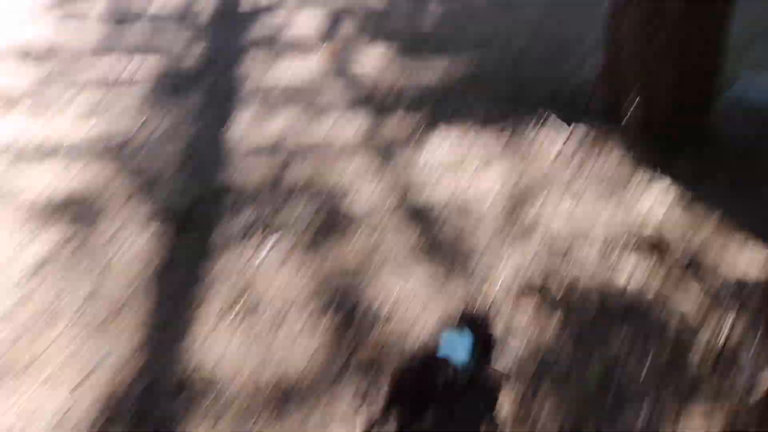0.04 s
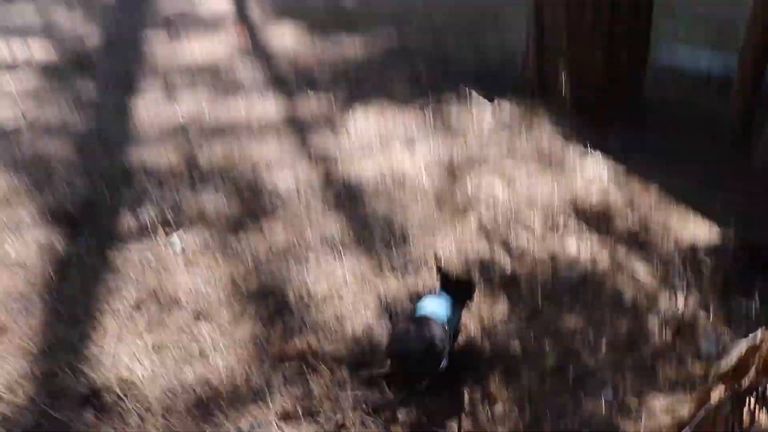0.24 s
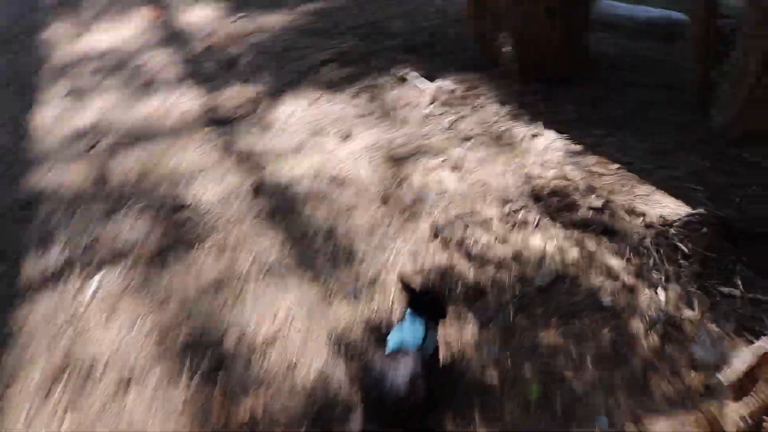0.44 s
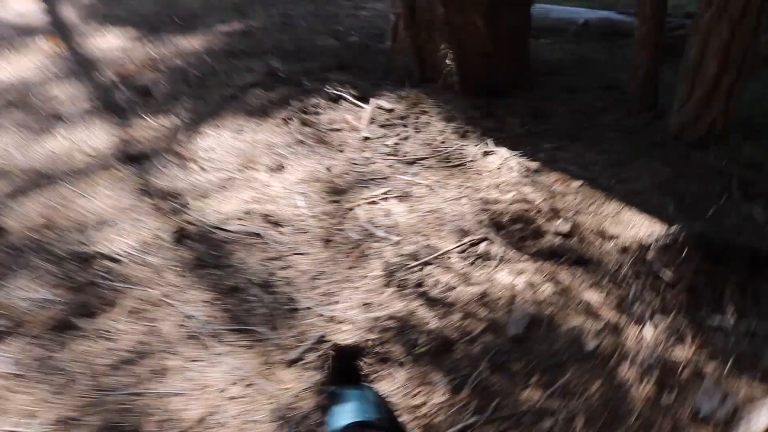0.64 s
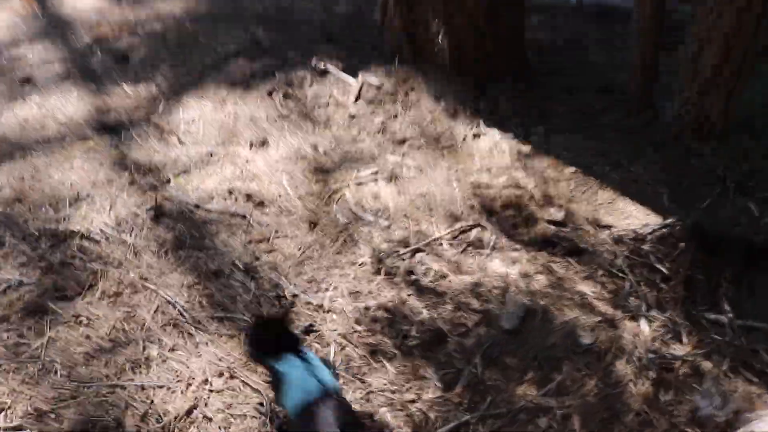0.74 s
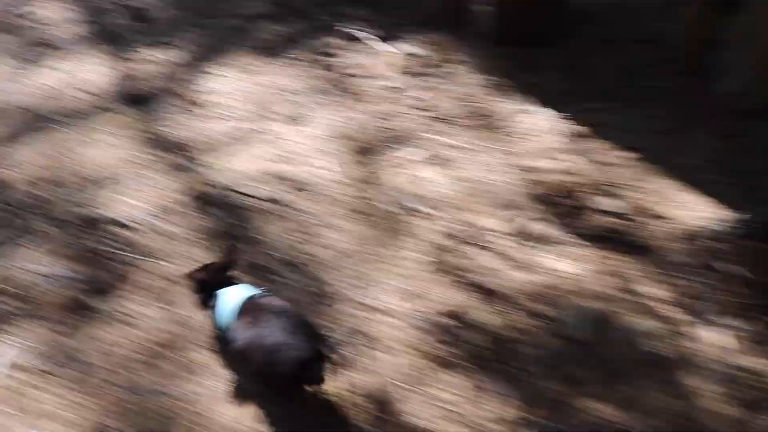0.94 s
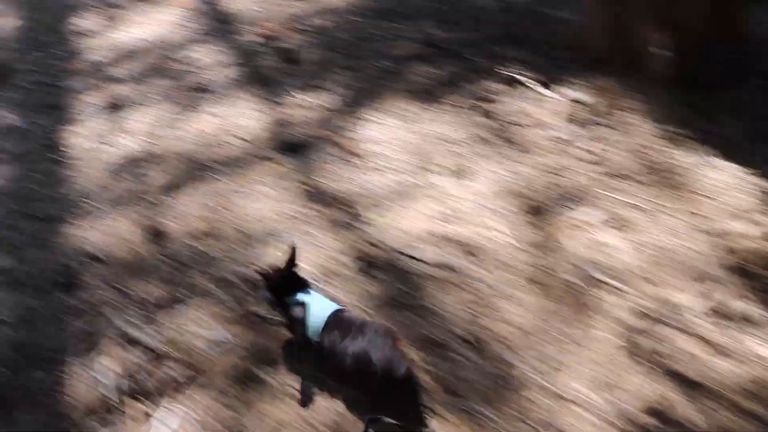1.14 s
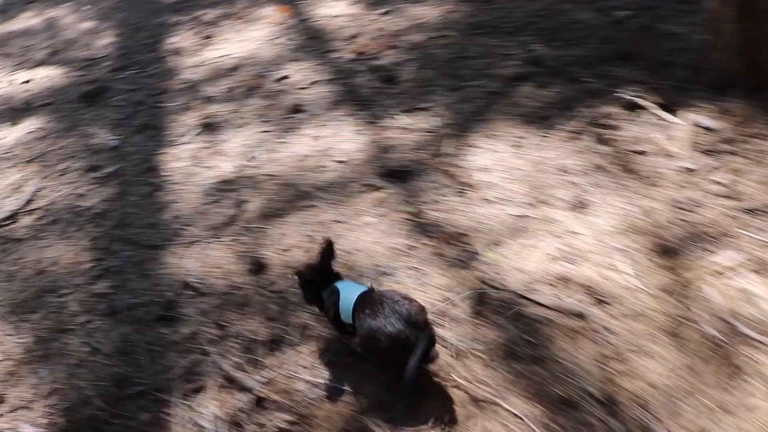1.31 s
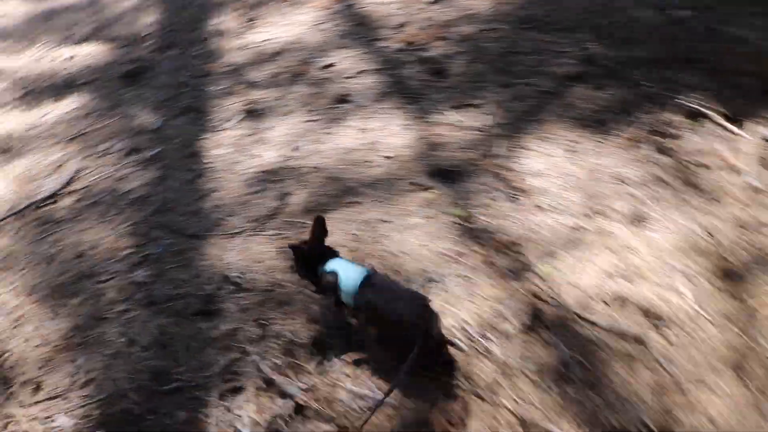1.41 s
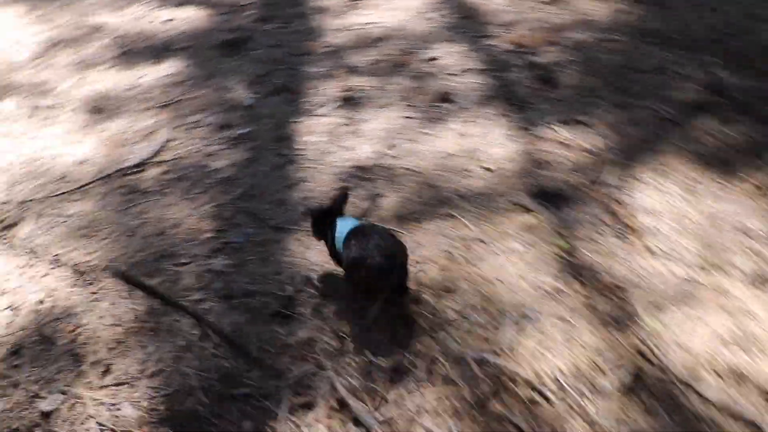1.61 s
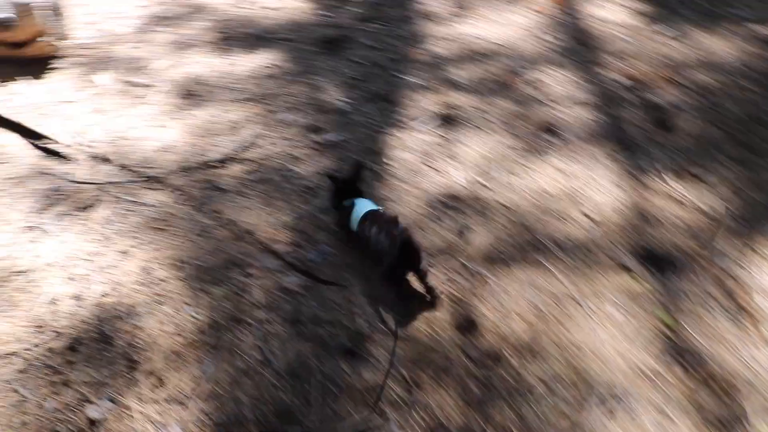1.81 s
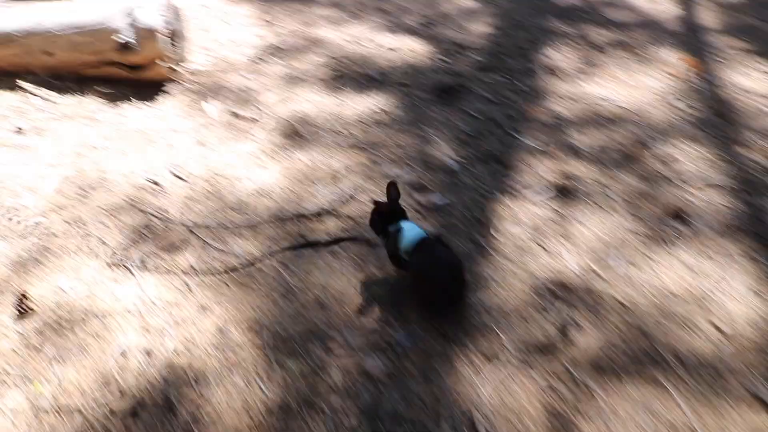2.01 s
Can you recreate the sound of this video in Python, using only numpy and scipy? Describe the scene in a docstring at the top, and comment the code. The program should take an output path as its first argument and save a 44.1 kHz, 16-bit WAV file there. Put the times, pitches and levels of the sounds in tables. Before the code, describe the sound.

Crunching footsteps on dry pine needles and soil, with small twigs snapping underfoot in a forest

```python
"""Footsteps on dry pine litter

A hand-held stereo recorder in a forest, with steps on dry pine needles and soil.
Each step crushes the litter: random clicks ring short resonances as dull pops with a fine bright crackle on top.
Single twigs snap clearly: a noise tick, a damped thud and its dull echo off the ground.
A faint rustle of shaped noise lies below; moving air, lumpy low noise, buffets mainly the right microphone port."""
import sys
import numpy as np
from scipy import signal
from scipy.fft import rfft, irfft
from scipy.io import wavfile
from scipy.ndimage import uniform_filter1d

SR = 44100
rng = np.random.default_rng(int(sys.argv[2]) if len(sys.argv) > 2 else 0)


def int16_out(signal):
    """Quantize to a 16-bit WAV file."""
    q = np.round(np.clip(np.atleast_2d(signal).T, -1, 1) * 32767)
    wavfile.write(sys.argv[1], SR, q.astype(np.int16))


N = 90890   # samples

# Levels below are those at the source, before the stereo lean and the recorder's top cut.
# Faint forest rustle, spectrum: pitch_hz, level_db (relative)
RUSTLE_SPECTRUM = [(24, -6), (40, 6), (163, -10), (269, -1.5), (1680, -13.5), (3470, -12), (5580, -15),
                   (10400, -16.5), (14100, -19), (16000, -25)]
# Rustle common to both sides: pitch_hz, shared_power (0 to 1)
RUSTLE_SHARED = [(100, 0.44), (600, 0.39), (2500, 0.2), (8000, 0.18)]
# Air buffeting the ports, the right port carrying twice this amplitude: start_s, level_db
WIND_BUFFETING = [(0, -70), (.03, -52), (.1, -52), (.13, -43), (.16, -52), (.19, -42), (.23, -56),
                  (.4, -50), (.47, -42), (.52, -38), (.58, -49), (.65, -38), (.7, -61), (.81, -56),
                  (.86, -70), (1.05, -58), (1.08, -49), (1.15, -49), (1.24, -62), (1.29, -50), (1.375, -60),
                  (1.405, -43), (1.46, -52), (1.58, -60), (1.79, -61), (1.815, -54), (1.88, -68),
                  (1.97, -50), (2.01, -48), (2.06, -58)]
# Snapping twigs: start_s, thud_peak_db, middle_tick_peak_db, fine_tick_db (before its trims), middle_tick_pitch_hz
TWIG_SNAPS = [(0.027, -28, -33, -43, 3000), (0.1199, -40, -28, -41, 3700), (0.1255, -34, -27, -35, 1800),
              (0.1684, -33, -32, -36, 2600), (0.244, -46, -32, -29, 4500), (0.3579, -36, -33, -40, 3500),
              (0.4565, -38, -36, -44, 2000), (0.5365, -19, -30, -34, 3000), (0.5771, -27, -25, -28, 4000),
              (0.6202, -28, -25, -31, 4300), (0.656, -24, -29, -22, 1800), (0.669, -30, -34, -44, 1800),
              (0.6804, -36, -39, -38, 3000), (0.7373, -37, -42, -49, 2500), (0.8075, -51, -34, -48, 4200),
              (0.8589, -43, -34, -33, 4500), (0.9801, -26, -34, -38, 3500), (1.0023, -49, -41, -35, 3800),
              (1.0339, -33, -29, -30, 4300), (1.0731, -34, -40, -45, 2000), (1.0825, -50, -36, -50, 4000),
              (1.0897, -33, -36, -38, 2000), (1.1056, -34, -32, -39, 3000), (1.1145, -27, -32, -36, 2500),
              (1.1535, -26, -34, -36, 2000), (1.1693, -18, -21, -28, 1800), (1.1724, -13, -33, -31, 1800),
              (1.18, -18, -32, -36, 4500), (1.2825, -28, -32, -43, 2200), (1.3057, -29, -39, -44, 1800),
              (1.3527, -40, -30, -39, 3200), (1.3698, -36, -36, -44, 2600), (1.4806, -56, -50, -39, 3700),
              (1.4944, -46, -43, -35, 3700), (1.5168, -56, -30, -34, 3700), (1.563, -50, -34, -43, 3100),
              (1.7004, -52, -41, -45, 3500), (1.7408, -42, -40, -47, 2600), (1.7873, -40, -44, -51, 1800),
              (1.8166, -41, -35, -45, 1800), (1.8429, -36, -37, -44, 3500), (1.9282, -25, -28, -36, 3600),
              (1.9633, -30, -30, -44, 1800), (1.9759, -23, -27, -35, 1800), (2.0219, -30, -32, -39, 2100),
              (2.0326, -28, -33, -40, 2200)]
# Litter crushed under the feet: start_s, dull_pops_level_db, middle_crackle_level_db, fine_crackle_level_db
CRUSH_LEVELS = [(0, -48.5, -48, -48), (0.022, -49.5, -42.5, -53), (0.035, -33.5, -42.5, -50),
                (0.06, -40, -40, -43), (0.09, -35.5, -34, -37), (0.13, -43.5, -42, -47.5),
                (0.2, -42, -43.5, -47), (0.25, -46.5, -46.5, -46), (0.31, -58, -55.5, -55),
                (0.35, -61, -58, -58), (0.362, -55, -41.5, -45), (0.39, -53.5, -58.5, -63),
                (0.47, -48.5, -50, -58), (0.5, -38, -41, -42.5), (0.53, -28, -32, -33),
                (0.575, -32.5, -36, -38.5), (0.6, -35, -40, -37.5), (0.625, -36, -38, -42.5),
                (0.645, -45, -46.5, -51), (0.69, -44, -48.5, -48.5), (0.72, -61, -56.5, -62),
                (0.94, -57, -55, -53), (1.06, -51, -49, -49), (1.13, -37.5, -46.5, -48),
                (1.17, -30, -37.5, -37), (1.2, -31, -40.5, -39.5), (1.25, -34, -40.5, -43),
                (1.275, -44, -47, -53), (1.35, -44.5, -46.5, -45.5), (1.385, -57, -57.5, -55.5),
                (1.475, -71, -58, -64), (1.49, -55, -52.5, -48.5), (1.6, -63, -58.5, -57.5),
                (1.79, -59.5, -102, -59), (1.815, -46.5, -49.5, -54), (1.86, -53.5, -55, -53),
                (1.93, -35.5, -42.5, -47), (1.98, -45.5, -46, -48.5), (2.06, -42.5, -46.5, -46.5)]
# Spectrum of the dull pops: pitch_hz, level_db (relative, per Hz)
POP_SPECTRUM = [(200, -9), (290, -5), (400, -12), (520, -8), (720, -3), (1000, -7), (1900, -12.5)]
# Spectrum of the middle crackle: pitch_hz, level_db (relative)
MIDDLE_SPECTRUM = [(1500, -4.5), (2200, -8), (3200, -8), (4600, -5), (5800, -8)]
# Spectrum of the fine crackle: pitch_hz, level_db (relative)
FINE_SPECTRUM = [(6000, -8), (7200, -6.5), (8700, -8), (11000, -10), (13700, -15), (15800, -33)]
# Stereo lean of ground sounds: pitch_hz, left_minus_right_db
STEREO_LEAN = [(400, -1), (1400, 0.5), (3100, -6), (6800, -0.5), (15000, -2)]

RUSTLE_DB, RUSTLE_PATCHY_DB = -52, 3.2
WIND_LOW_HZ, WIND_HIGH_HZ, WIND_LUMP_DB = 44.5, 137, 2.5
WIND_EVEN_S = 0.0454   # the buffeting keeps to its level over this span
WIND_LEFT_DB, WIND_LEFT_FOLLOWS = -61, 0.4   # sheltered port: level, share of the dB swings
# One hard puff on the right port: time, strength ahead of its band-pass, pitch, cycles to die by 60 dB
PUFF_S, PUFF_DB, PUFF_HZ, PUFF_CYCLES = .6058, -6.5, 175, 2.2
THUD_HZ, THUD_CYCLES = 655, 4.46   # cycles to die by 60 dB
GROUND_ECHO_S, GROUND_ECHO_DB = 0.00447, -14
TICK_S, TICK_WIDTH = 0.00072, 1.285   # fall to 1/e; the middle tick spans its pitch over and times this
FINE_TICK_HZ, FINE_TOP_HZ = (7000, 10500), 16000
FINE_TICK_DB, TOP_TICK_DB = 2, -3   # trims of the fine tick and of its brightest edge
POPS_PER_S, MIDDLE_PER_S, FINE_PER_S = 2500, 7000, 9000   # before clumping
BREAKS_PER_S, BREAK_SHARE = 320, .38   # full-range needle cracks; their share of the crush power
SPREAD_S, LEFT_LEAD_S = .00009, .00003   # spread of left-right lag between grains; lead of the left port
CUTOFF_HZ = 16200


def amp(db):
    """dB to gain."""
    return 10 ** (np.asarray(db) / 20)


def rms_one(x):
    """Scale to unit rms."""
    return x / np.sqrt(np.mean(x ** 2) + 1e-20)


def in_time(rows):
    """Columns of a curve table, one value per sample."""
    s, *columns = np.transpose(rows)
    return [np.interp(np.arange(N) / SR, s, column) for column in columns]


def at_hz(points, hz):
    """Read a spectrum table on a log-frequency axis."""
    table_hz, table_db = np.transpose(points)
    return np.interp(np.log(hz), np.log(table_hz), table_db)


def coloured(x, points):
    """Shape the spectrum by a table of pitch_hz, level_db."""
    hz = np.arange(N // 2 + 1) * SR / N + 1   # +1 keeps the log finite
    return irfft(rfft(x) * amp(at_hz(points, hz)), N)


def band(x, low_hz, high_hz):
    """Second-order band-pass."""
    return signal.sosfilt(signal.butter(2, [low_hz, high_hz], "band", fs=SR, output="sos"), x)


def drift(rate_hz):
    """Slow random wander of spread 1: noise through two equal smoothing poles."""
    pole = np.exp(-2 * np.pi * rate_hz / SR)
    wander = signal.lfilter([1], [1, -2 * pole, pole * pole], rng.standard_normal(N + SR))
    return rms_one(wander[SR:])   # the first second lets the filter settle


def ring(clicks, hz, cycles):
    """Each unit click rings a sine that dies by 60 dB in the given cycles."""
    pole = amp(-60 * hz / (cycles * SR))
    turn = 2 * np.pi * hz / SR
    return signal.lfilter([0, np.sin(turn)], [1, -2 * pole * np.cos(turn), pole * pole], clicks + 1e-18)


def rustle():
    """The faint steady rustle of the forest: gently patchy noise, partly common to both sides."""
    white = rng.standard_normal((3, N))
    hz, share = np.transpose(RUSTLE_SHARED)
    common = coloured(white[2], np.c_[hz, 10 * np.log10(share)])
    own = coloured(white[:2], np.c_[hz, 10 * np.log10(1 - share)])
    patches = amp(RUSTLE_DB + RUSTLE_PATCHY_DB * drift(24))
    return patches * rms_one(coloured(common + own, RUSTLE_SPECTRUM))


def wind():
    """Moving air as lumpy low noise, own in each port, far stronger on the right, with one hard puff."""
    level_db, = in_time(WIND_BUFFETING)
    low = band(rng.standard_normal((2, N)), WIND_LOW_HZ, WIND_HIGH_HZ)
    low = rms_one(low * amp(WIND_LUMP_DB * drift(36)))
    low = low / np.sqrt(uniform_filter1d(low ** 2, int(WIND_EVEN_S * SR)) + 0.03)
    left_gain = amp(WIND_LEFT_DB + WIND_LEFT_FOLLOWS * (level_db - level_db.mean()))
    out = low * [left_gain, 2 * amp(level_db)]
    click = np.zeros(N)
    click[int(PUFF_S * SR)] = amp(PUFF_DB)
    out[1] += band(ring(click, PUFF_HZ, PUFF_CYCLES), 30, 700)
    return out


def snap_thud(t):
    """A short damped thud that dips first, and its dull echo off the ground."""
    echo = int(GROUND_ECHO_S * SR)
    decay = amp(-60 * THUD_HZ * t / THUD_CYCLES)
    rise = np.minimum(t * THUD_HZ * 4, 1)   # a quarter cycle
    thud = -np.cos(2 * np.pi * THUD_HZ * t - .3) * decay * rise
    thud = thud / np.abs(thud).max()
    thud[echo:] += amp(GROUND_ECHO_DB) * thud[:-echo]
    return thud


def snaps():
    """Snapping twigs: a burst of noise makes the sharp tick, over a thud with its ground echo."""
    size = SR // 50
    t, out = np.arange(size) / SR, np.zeros((2, N + size))
    thud = snap_thud(t)
    noises = rng.standard_normal((len(TWIG_SNAPS), 3, size))
    for (s, thud_db, middle_db, fine_db, hz), noise in zip(TWIG_SNAPS, noises):
        burst = (noise[:2] + noise[2]) * np.exp(-t / TICK_S)   # each side's own noise plus a common one
        burst[:, 0] -= 5   # a hard downward first edge
        middle = band(burst, hz / TICK_WIDTH, hz * TICK_WIDTH)
        middle = middle / np.abs(middle.mean(0)).max()
        fine = band(burst, *FINE_TICK_HZ)
        fine = amp(FINE_TICK_DB) * fine / np.abs(fine.mean(0)).max()
        top = band(burst, FINE_TICK_HZ[1], FINE_TOP_HZ)
        fine = fine + amp(TOP_TICK_DB) * top / np.abs(top).max()
        i = int(s * SR)
        out[:, i:i + size] += amp(thud_db) * thud + amp(middle_db) * middle + amp(fine_db) * fine
    return out[:, :N]


def grains(per_s, spectrum, cycles, uneven_db, clump_db, spread_db):
    """Random breaks in clumps, each from its own spot, dealt to short resonances; rms 1."""
    luck = rng.random(N)
    chance = per_s * amp(clump_db * drift(40)) / SR
    when = np.flatnonzero(luck < chance)
    draw = rng.random((N, 3))[when]
    place = rng.standard_normal((N, 2))[when]   # lag and level between the sides
    size_db = uneven_db * np.minimum(-np.log(1 - draw[:, 0]), 5)
    size = amp(size_db) * np.sign(draw[:, 1] - .5)
    pitches = np.geomspace(spectrum[0][0], spectrum[-1][0], 20)
    dealt = (draw[:, 2] * len(pitches)).astype(int)
    out = 0
    for k, hz in enumerate(pitches):
        mine, clicks = dealt == k, np.zeros((2, N))
        for ear, side in enumerate((1, -1)):
            at = when[mine] + side * place[mine, 0] * SPREAD_S * SR / 2
            whole = np.clip(np.floor(at).astype(int), 0, N - 2)
            gain = size[mine] * amp(side * place[mine, 1] * spread_db / 2)
            # a click between two samples is split over both
            np.add.at(clicks[ear], whole, gain * (1 - at % 1))
            np.add.at(clicks[ear], whole + 1, gain * (at % 1))
        out = out + amp(at_hz(spectrum, hz)) * hz * ring(clicks, hz, cycles)
    return rms_one(out)


def breaks():
    """Stiffer needles crack: sparse sharp clicks of very uneven size, each from its own side."""
    size_db = 4.0 * np.minimum(rng.exponential(1, N), 3)
    size = amp(size_db) * (rng.random(N) < BREAKS_PER_S / SR)
    return -size * amp(2 * rng.standard_normal(N) * [[1], [-1]])


def crush():
    """Three sizes of litter break under the sole; stiffer needles crack through all three ranges at once."""
    dull_db, middle_db, fine_db = in_time(CRUSH_LEVELS)
    sharp = breaks()

    def layer(litter, points, low_hz, high_hz):
        """Own grains plus the shared cracks in the same colour."""
        own = rms_one(band(litter, low_hz, high_hz))
        cracks = rms_one(band(coloured(sharp, points), low_hz, high_hz))
        return np.sqrt(1 - BREAK_SHARE) * own + np.sqrt(BREAK_SHARE) * cracks

    pops = grains(POPS_PER_S, POP_SPECTRUM, cycles=7.0, uneven_db=3.2, clump_db=2.0, spread_db=1.6)
    middle = grains(MIDDLE_PER_S, MIDDLE_SPECTRUM, cycles=10.0, uneven_db=2.8, clump_db=2.0, spread_db=2.6)
    fine = grains(FINE_PER_S, FINE_SPECTRUM, cycles=24.0, uneven_db=0.91, clump_db=3.6, spread_db=6.9)
    return (amp(dull_db) * layer(pops, POP_SPECTRUM, 230, 1900)
            + amp(middle_db) * layer(middle, MIDDLE_SPECTRUM, 1300, 5800)
            + amp(fine_db) * layer(fine, FINE_SPECTRUM, 6050, FINE_TOP_HZ))


def scene():
    """Steps and rustle lean a little to the right yet reach the left port first; the wind is on the ports."""
    half_lean = np.array(STEREO_LEAN) * [1, .5]
    ground = crush() + snaps() + rustle()
    hz = np.arange(N // 2 + 1) * SR / N
    late = irfft(rfft(ground[1]) * np.exp(-2j * np.pi * hz * LEFT_LEAD_S), N)
    left = coloured(ground[0], half_lean)
    right = coloured(late, half_lean * [1, -1])
    return np.array([left, right]) + wind()


def record(dry):
    """The recorder's top is cut by a steep elliptic low-pass."""
    return signal.sosfilt(signal.ellip(12, .5, 70, CUTOFF_HZ, fs=SR, output="sos"), dry)


dry = scene()
out = record(dry)
int16_out(out)
```